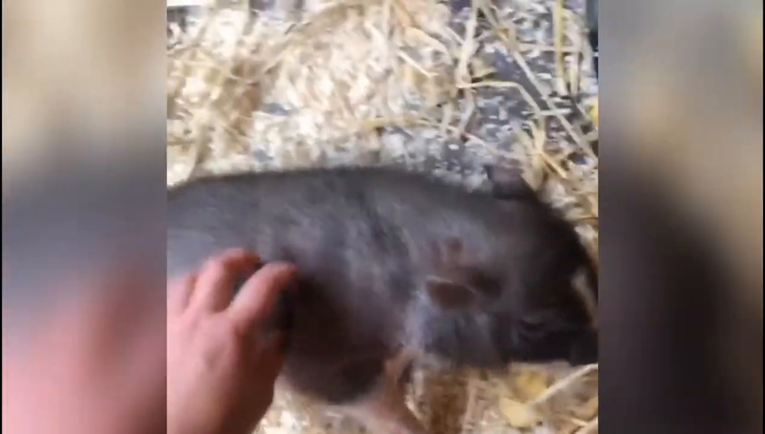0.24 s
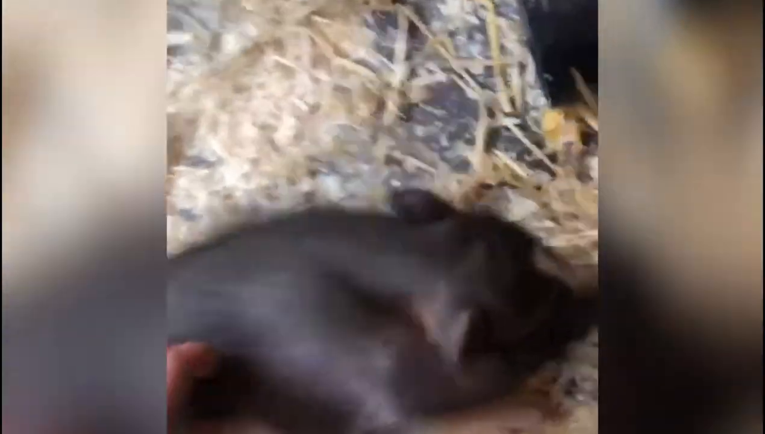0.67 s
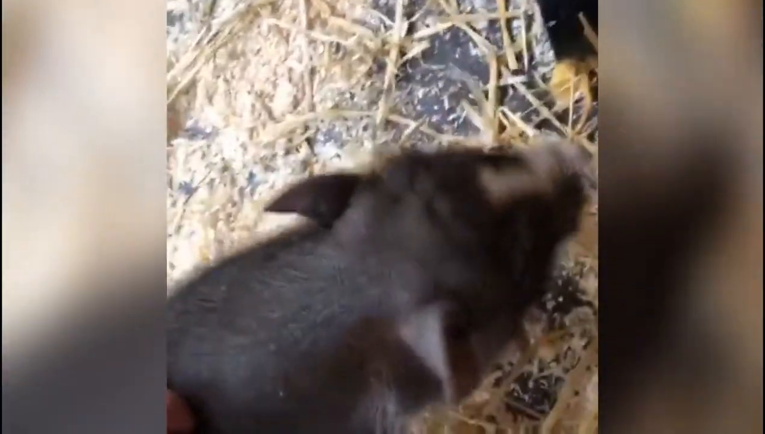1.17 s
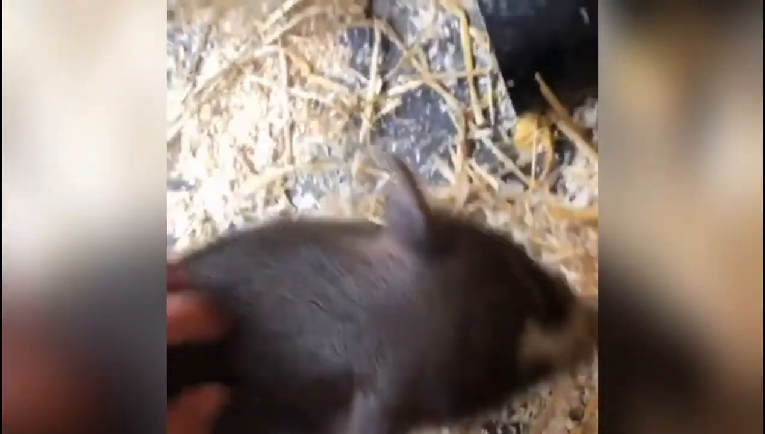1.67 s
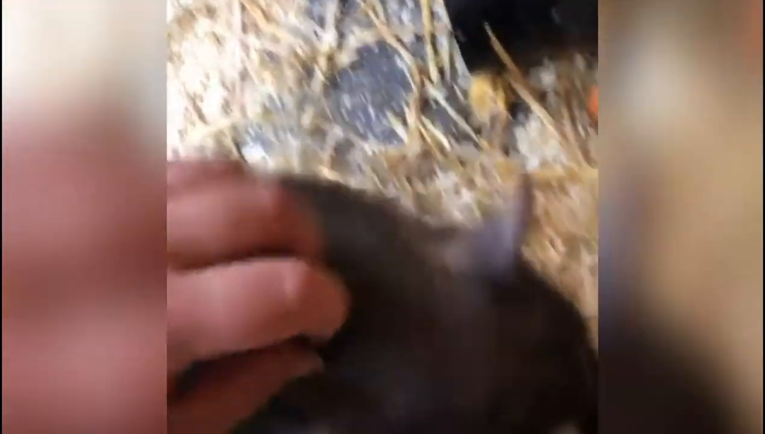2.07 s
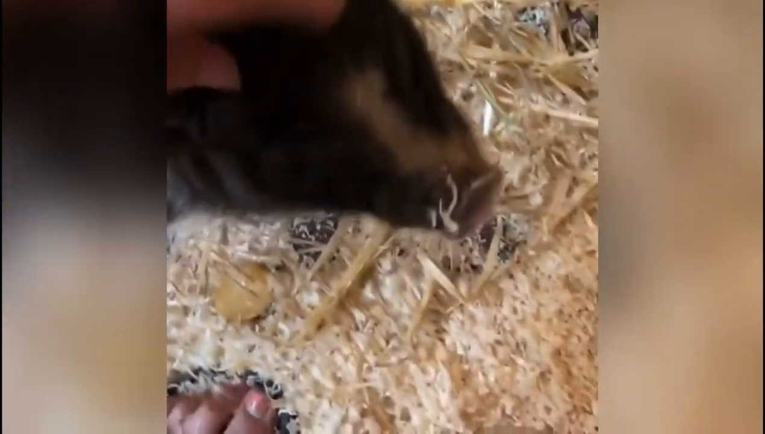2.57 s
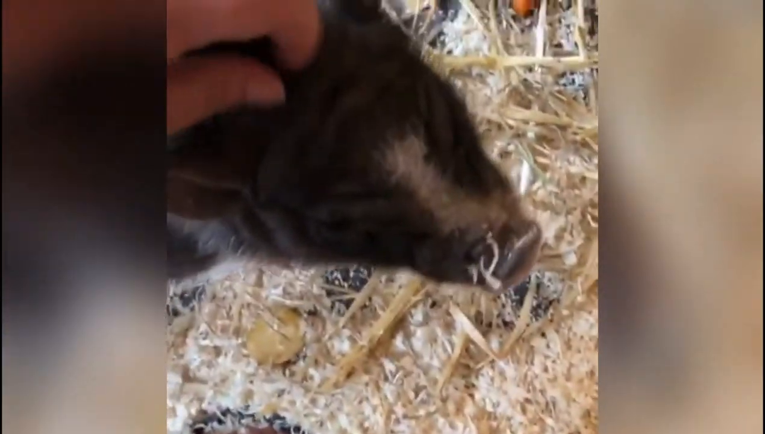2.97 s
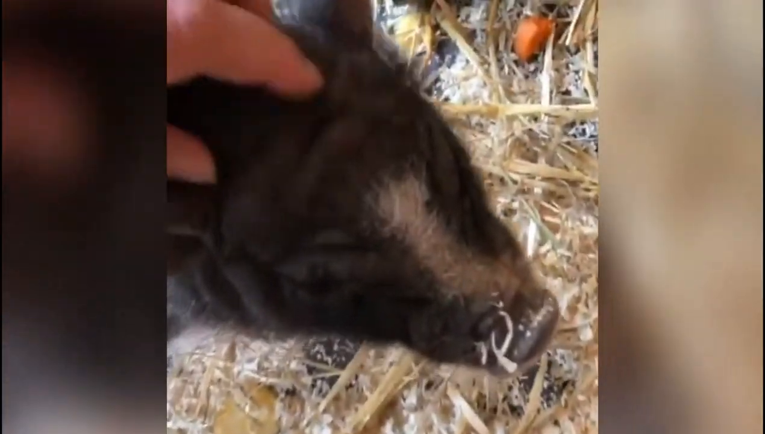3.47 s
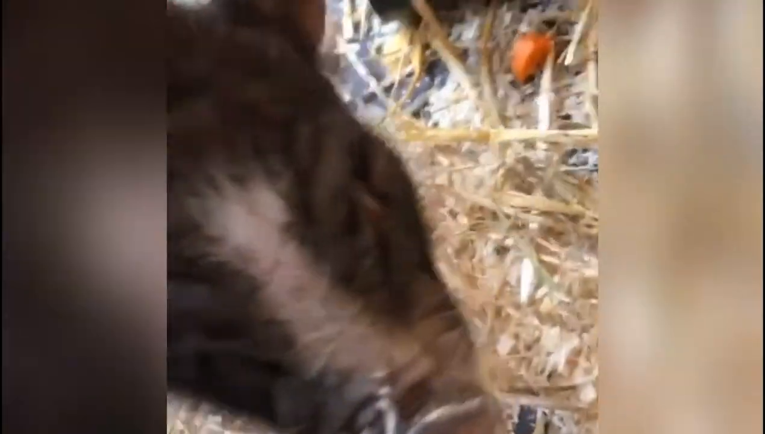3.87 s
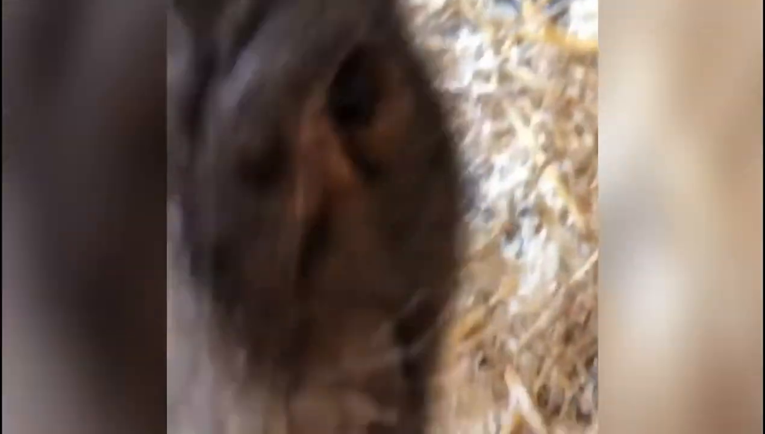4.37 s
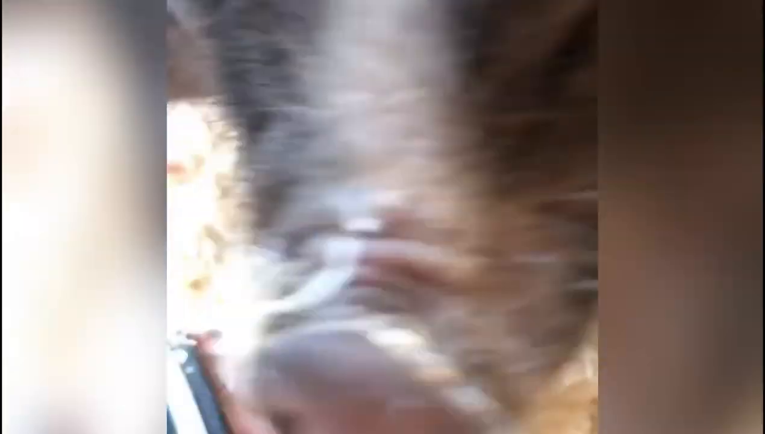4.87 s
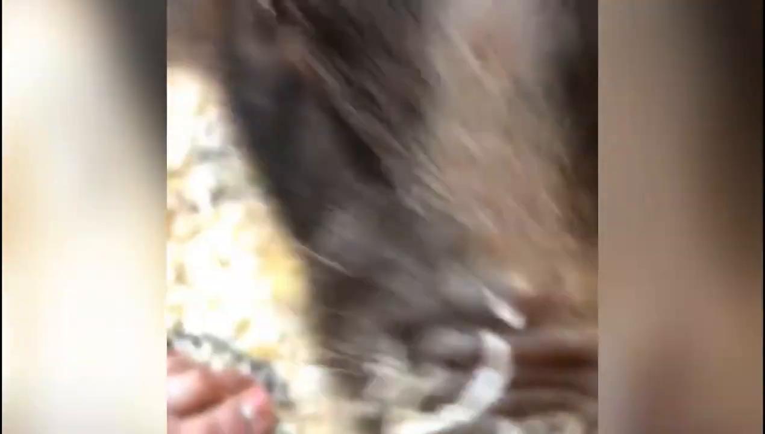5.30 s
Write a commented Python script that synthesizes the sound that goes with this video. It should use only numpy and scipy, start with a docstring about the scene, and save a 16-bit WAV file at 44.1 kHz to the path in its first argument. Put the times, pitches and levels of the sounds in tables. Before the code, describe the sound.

A low motor hum throbs evenly throughout in a small pen with little echo. Close to the microphone, fingers brush a piglet's bristly coat as it grunts briefly several times, sniffs and smacks its lips, with an occasional tick of straw. The grunting stops for about two seconds while light scratching continues. Then the piglet sounds right at the microphone, with several short, nasal grunts, snuffles and smacks.

```python
"""In a straw-bedded pen, a piglet is stroked, heard close by over the beating hum of a machine.
Each short grunt is a handful of slow vocal-fold slaps that excite the resonances of its chest,
throat, mouth and snout. Between grunts it snuffles with turbulent breath and smacks its lips,
while a hand rubs and scratches its bristles, which flick from under the fingers."""
import sys
import numpy as np
from scipy import signal
from scipy.fft import rfft
from scipy.io import wavfile
from scipy.ndimage import uniform_filter1d

SR = 44100
rng = np.random.default_rng(int(sys.argv[2]) if len(sys.argv) > 2 else 0)


def bounce(signal):
    """Save signal as a 16-bit WAV file at the path given by the first command-line argument."""
    frames = np.transpose(np.atleast_2d(signal))
    limited = np.clip(frames, -1, 1)
    pcm = np.round(limited * 32767).astype(np.int16)
    wavfile.write(sys.argv[1], SR, pcm)


N = 244314
TIME = np.arange(N) / SR


def grunt(slap_hz, count, first_db, fade_db, breathiness, chest_db, throat_db, throat_hz, mouth_db,
          tilt_db, snout_db, snout_hz, lower_peak_db, nostril_db):
    """Source and filter: slack vocal folds slap a few times and ring the cavities of the airway."""
    # Each row of these three: mode frequency before tuning in Hz, bandwidth in Hz, relative gain in dB.
    chest_modes = [(84, 16, 2), (157.5, 25, 15), (229, 210, -10.5)]
    mouth_modes = [(790, 150, -1), (960, 150, 0), (1290, 200, -11)]
    nostril_modes = [(3900, 350, 5), (4720, 730, 21), (6500, 2700, 12), (9150, 2400, 11), (10000, 1700, 4)]
    # Spectrum of the closing puff. Each row: frequency in Hz, relative spectral density in dB.
    puff_spectrum = [(300, 20), (1200, 9.5), (3000, 4.5), (7500, 2.5), (10000, 1), (14000, -5)]
    jitter_db, chest_lag_s, air_lag_s = 3.0, 0.0051, 0.0043
    puff_rise_s, puff_fall_s = 0.015, 0.031
    t = np.arange(SR // 4) / SR
    length = count / slap_hz
    hard, dull, pushes = np.zeros((3, len(t)))
    for k in range(count):
        onset = k / slap_hz
        db = (fade_db * (k - 1) if k else first_db) + jitter_db * rng.standard_normal()
        pulse = slap(t)
        add(hard, onset, amp(db) * pulse)
        add(dull, onset, amp(0.4 * db) * pulse)  # a weak slap loses more treble than middle
        add(pushes, onset + chest_lag_s, np.array([(k + 1.) ** 0.84]))  # flow grows to the last slap
    # Air leaking between the slaps rings the same resonances.
    air_envelope = np.exp(-((t - length / 2 - air_lag_s) / (length / 2)) ** 2)
    air = np.sqrt(breathiness) * unit(rng.standard_normal(len(t)) * air_envelope)
    hard, dull, pushes = (np.sqrt(1 - breathiness) * unit(x) + air for x in (hard, dull, pushes))
    # Throat and snout each have a main peak and a second one below it.
    throat = band(dull, throat_hz, 90) + 0.72 * band(dull, 0.695 * throat_hz, 100)
    snout = band(hard, snout_hz, 360) + amp(lower_peak_db) * band(hard, 0.818 * snout_hz, 360)
    snout += 0.085 * band(hard, 3000, 6000)  # broadband leak
    # The folds part and the rest of the air escapes.
    puff_envelope = np.exp(np.minimum((t - length) / puff_rise_s, (length - t) / puff_fall_s))
    puff = colour(rng.standard_normal(len(t)), puff_spectrum) * puff_envelope
    parts = [(chest_db, cavity(pushes, chest_modes, tuning=0.98, tilt_db=tilt_db)),
             (throat_db, throat),
             (mouth_db, cavity(dull, mouth_modes, tuning=0.95, tilt_db=tilt_db)),
             (snout_db, snout),
             (nostril_db, cavity(hard, nostril_modes, tuning=0.9, tilt_db=1)),
             (nostril_db - 17, band(hard, 8400, 4800)),  # the wet top of each slap
             (snout_db - 4, puff)]
    # Levels are rms over a tenth of a second.
    return sum(amp(db) * x / np.linalg.norm(x) for db, x in parts) * np.sqrt(SR / 10)


def slap(t):
    """Impulsive excitation: the folds meet with a click and a wet splash of treble."""
    splash = band(rng.standard_normal(len(t)), 8000, 13000) * np.exp(-((t - .001) / .0018) ** 2)
    return (t == 0) + .15 * splash


def grunts():
    """Intermittent phonation: each short pulse train has its own rate and resonance levels."""
    # Each row: start in seconds, slap rate in Hz, slap count, first slap against the second in dB,
    # change per later slap in dB, breath share from 0 to 1, chest level in dB, throat level in dB,
    # throat peak in Hz, mouth level in dB, chest and mouth tilt in dB per octave, snout level in dB,
    # snout peak in Hz, relative gain of its lower peak in dB, nostril level in dB.
    calls = [ (.3770, 72.3, 5, -4, -4, 0.42, -28.5, -31.5, 440, -45.5, 4, -50, 2700, -5.5, -53.5),
             (1.084, 79, 5, -5, -3.5, 0.54, -32, -39.5, 392, -42.5, -11, -46.5, 2330, -15, -56),
             (1.459, 79.4, 2, 15, -10, 0.03, -38, -54.5, 357, -56, -11, -66, 2450, 0, -67),
             (2.3876, 77.5, 4, 1, 3.5, 0.37, -23.5, -37.5, 383, -46, 9, -41, 2590, 1, -61),
             (4.405, 72, 4, -12.5, -2, .15, -22.5, -36, 411, -41, 6, -41, 2650, -5.5, -41.5),
             (4.9601, 69.5, 3, -16, -3, .05, -26, -34, 409, -32.5, -2.5, -41.5, 2640, -9, -41.5),
             (5.206, 79, 3, 15, -17, 0.35, -37, -48, 340, -49.5, 0, -65, 2730, -14, -56),
             (5.4372, 70, 4, -16, -4, 0.1, -24, -33.5, 417, -38.5, -1.5, -40.5, 2800, -7, -42), ]
    voice = np.zeros(N)
    for start, *shape in calls:
        add(voice, start, grunt(*shape))
    return voice


def clicks(relative_width=0.7):
    """Damped transients: lips smack, straws snap, and a dull first vocal-fold slap opens one grunt."""
    # Noise bursts, each in one broad resonance; the loudest is the vocal-fold slap.
    # Each row: start in seconds, peak level in dB, centre frequency in Hz, decay time in seconds.
    bursts = [(0.711, -39.5, 2130, 0.0021), (0.958, -35, 3670, 0.0009), (1.084, -32, 6800, 0.0043),
              (1.594, -39, 2400, 0.021), (1.6856, -37.5, 2270, 0.0043), (1.795, -30, 6060, 0.0025),
              (1.835, -34.5, 2200, 0.0022), (2.3285, -36, 9100, 0.002), (4.397, -30, 1260, 0.0041),
              (4.5646, -43.5, 6500, 0.0026), (4.6754, -43.5, 6600, 0.0031), (4.7625, -32, 2370, 0.0028),
              (4.86, -45.5, 4000, 0.0043), (4.8844, -42.5, 6840, 0.011), (4.9, -41.5, 2200, 0.003),
              (4.952, -23, 900, .003), (5.298, -40, 6500, 0.004), (5.359, -34, 950, 0.0045),
              (5.424, -37.5, 2840, 0.0081)]
    out, t = np.zeros(N), np.arange(SR // 20) / SR
    for start, db, hz, decay in bursts:
        burst = band(rng.standard_normal(len(t)) * np.exp(-t / decay), hz, hz * relative_width)
        add(out, start, amp(db) * burst / abs(burst).max())
    return out


def snuffles(rise_s=0.024, fall_s=0.057, flutter_db=1.0):
    """Turbulence: sniffed air excites the nasal resonances and flutters in the moist nostrils."""
    # Modes of the open nose and of narrowed nostrils.
    # Each row: frequency in Hz, bandwidth in Hz, relative gain in dB.
    open_modes = [(750, 340, 1), (1606, 420, 1.5), (1815, 260, 3.5), (2404, 620, -4.5), (3940, 730, -8),
                  (4370, 170, -13)]
    narrow_modes = [(4000, 330, -12), (4590, 1100, 31), (5800, 260, -12), (6500, 400, -6),
                    (8400, 1500, -31)]
    # Each row: start in seconds, length in seconds, snuffle level in dB, hiss level in dB.
    sniffs = [(1.08, 0.049, -40, -63), (1.188, 0.081, -41, -51.5), (1.3, 0.59, -55.5, -62),
              (2.589, 0.27, -57.5, -59.5), (3.866, 0.64, -69, -58.5), (5.044, 0.15, -54.5, -54),
              (5.157, 0.095, -45, -58)]
    snuffle = unit(cavity(rng.standard_normal(N), open_modes))
    hiss = unit(cavity(rng.standard_normal(N), narrow_modes))
    air = sum(gesture(start, length, rise_s, fall_s) * (amp(snuffle_db) * snuffle + amp(hiss_db) * hiss)
              for start, length, snuffle_db, hiss_db in sniffs)
    return air * amp(flutter_db * drift(samples=300))


def stroking_hand(flicks_per_s=7000, spread_db=3, resting_db=-67.5, catch_db=1):
    """Friction noise: thousands of bristles flick from under the fingers; scratches are short surges."""
    # Slides of the hand. Each row: start in seconds, length in seconds, level in dB.
    strokes = [(0.263, 0.44, -52.5), (0.706, 0.27, -46.5), (1.03, 0.26, -47.5), (1.307, 0.43, -53.5),
               (1.8, .17, -49), (1.994, 0.59, -60), (2.583, .34, -55), (3.852, 0.65, -60.5),
               (4.666, .1, -58), (5.016, 0.18, -52.5), (5.28, 0.33, -60)]
    # Fingertip scratches. Each row: midpoint in seconds, level in dB.
    scratches = [(.118, -54), (1.785, -45), (1.849, -41), (2.04, -51), (3.017, -59), (3.136, -61),
                 (3.253, -60.5), (3.386, -61), (3.47, -74), (3.585, -58), (3.688, -61), (3.795, -57)]
    # Each row: frequency in Hz, relative spectral density in dB.
    bristle_spectrum = [(400, 5), (1200, 3), (2200, 4.5), (3300, 0.5), (5000, 2.5), (7800, 3.5), (10000, 0),
                        (14000, 0)]
    press_s, lift_s, scratch_half_s = 0.058, 0.061, 0.026
    flicks = rng.standard_normal(N) * (rng.random(N) < flicks_per_s / SR)
    flicks *= amp(spread_db * np.minimum(rng.exponential(1, N), 5))  # a few stand out
    grain = colour(unit(flicks) + rng.standard_normal(N), bristle_spectrum)
    slides = sum(amp(db) * gesture(start, length, press_s, lift_s) for start, length, db in strokes)
    surges = sum(amp(db) * np.exp(-((TIME - middle) / scratch_half_s) ** 2) for middle, db in scratches)
    envelope = np.sqrt(amp(resting_db) ** 2 + slides ** 2 + surges ** 2)  # powers add
    return envelope * grain * amp(catch_db * drift(samples=400))


def machine(shaft_hz=38.65, motor_hz=166.0, motor_db=-46, rush_db=-47.5):
    """Beating: a second motor's tone lies near the fourth shaft harmonic, amid whines and rushing air."""
    # Harmonics as multiples of the shaft frequency, and their rms levels in dB.
    orders = [1, 4, 6, 8, 16, 24]
    order_levels = [-42, -40.5, -59, -64.5, -68.5, -74]
    # Faint tones of the casing. Each row: frequency in Hz, rms level in dB.
    whines = [(91.8, -58), (446.5, -66), (791, -69.5), (899, -95)]
    # The air that the machine moves. Each row: frequency in Hz, relative spectral density in dB.
    rush_spectrum = [(20, -16), (50, 0), (68, -7), (92, 7), (118, -6), (150, 7), (185, 6.5), (230, -5.5),
                     (275, -7.5), (430, -8.5), (650, -17.5), (900, -12), (1500, -18), (2300, -22.5),
                     (3000, -27), (6000, -28.5), (9000, -40.5), (14000, -40)]
    turns = shaft_hz * TIME + 0.0026 * drift(samples=20000)
    hum = sum(amp(db) * np.sin(2 * np.pi * (k * turns + rng.random()))
              for k, db in zip(orders, order_levels))
    hum += amp(motor_db) * np.sin(2 * np.pi * (motor_hz * TIME + rng.random()))
    for hz, db in whines:
        hum += amp(db) * np.sin(2 * np.pi * hz * TIME + drift(samples=6000))  # the phase wavers
    return np.sqrt(2) * hum + amp(rush_db) * colour(rng.standard_normal(N), rush_spectrum)


def pen(x, near_gain=0.31, near_s=0.0032, tail_db=-11, gap_s=.01, echoes_per_s=2500):
    """Reflection and absorption: one near echo, then a short tail whose treble the straw soaks up."""
    # Each row: frequency in Hz, time to decay by 60 dB in seconds.
    reverberation_times = [(100, 0.25), (500, 0.34), (2500, 0.26), (6000, 0.15), (12000, 0.13)]
    echoes = rng.choice([-1., 1.], SR // 2) * (rng.random(SR // 2) < echoes_per_s / SR)
    hz, t, spectra = signal.stft(echoes, SR, nperseg=256)
    decay = amp(-60 * t / value_at(reverberation_times, hz)[:, None])
    tail = signal.istft(spectra * decay, SR, nperseg=256)[1]
    response = np.zeros(SR)
    response[0] = 1
    add(response, gap_s, amp(tail_db) * tail / np.linalg.norm(tail))
    # A small surface returns only the treble.
    add(response, near_s, near_gain * np.diff(signal.windows.hann(9)) / 2)
    return signal.fftconvolve(x, response)[:N]


def cavity(x, modes, tuning=1, tilt_db=0):
    """Modal superposition: resonances add with alternating sign, tilted by tilt_db per octave."""
    lowest_hz, highest_hz = modes[0][0], modes[-1][0]
    ring = sum((-1) ** k * amp(db + tilt_db * np.log2(hz / lowest_hz)) * resonate(x, hz * tuning, width)
               for k, (hz, width, db) in enumerate(modes))
    edges = [lowest_hz * .65, min(highest_hz * 1.35, SR / 2 - 1)]  # keeps either side of the modes dark
    return signal.sosfilt(signal.butter(2, edges, "band", fs=SR, output="sos"), ring)


def resonate(x, hz, width):
    """A second-order resonance with a peak gain of 1."""
    hz = min(hz, SR / 2 - 1000)
    return signal.lfilter(*signal.iirpeak(hz, hz / width, SR), x)


def band(x, hz, width):
    """A steep-sided resonance, with centre and width in Hz."""
    edges = np.clip([hz - width / 2, hz + width / 2], 20, SR / 2 - 1)
    return signal.sosfilt(signal.butter(2, edges, "band", fs=SR, output="sos"), x)


def colour(x, spectrum):
    """Spectral shaping: filters x by a curve in dB and scales it to rms 1."""
    gain = amp(value_at(spectrum, np.fft.rfftfreq(len(x), 1 / SR)))
    return unit(np.fft.irfft(rfft(x) * gain, len(x)))


def value_at(curve, hz):
    """Interpolation on a logarithmic frequency axis."""
    frequencies, values = np.transpose(curve)
    return np.interp(np.log(hz + 1), np.log(frequencies + 1), values)


def gesture(start, length, rise, fall):
    """An amplitude envelope: smooth attack, hold and smooth release."""
    return (1 + np.tanh((TIME - start) / rise)) * (1 + np.tanh((start + length - TIME) / fall)) / 4


def drift(samples):
    """Slow random modulation of rms 1: noise smoothed twice by a moving average."""
    return unit(uniform_filter1d(uniform_filter1d(rng.standard_normal(N), samples), samples))


def add(mix, start, sound):
    """Superposition: mixes a sound in at a start time in seconds."""
    part = mix[max(round(start * SR), 0):][:len(sound)]
    part += sound[:len(part)]


def amp(db):
    """Decibels to amplitude ratio."""
    return 10 ** (np.asarray(db) / 20)


def unit(x):
    """Normalisation to rms 1."""
    return x / np.sqrt(np.mean(x ** 2) + 1e-20)


def scene():
    """Superposition in mono: grunts and clicks echo in the pen; breath, hand and machine add dry."""
    return (pen(clicks() + grunts()) + snuffles() + stroking_hand() + machine())[None]


def record(dry, cutoff_hz=14050):
    """Band limiting: a steep low-pass filter removes the highest treble."""
    low_pass = signal.firwin(511, cutoff_hz, window=("kaiser", 9), fs=SR)
    return signal.oaconvolve(dry, low_pass[None], "same")


dry = scene()
out = record(dry)
bounce(out)
```